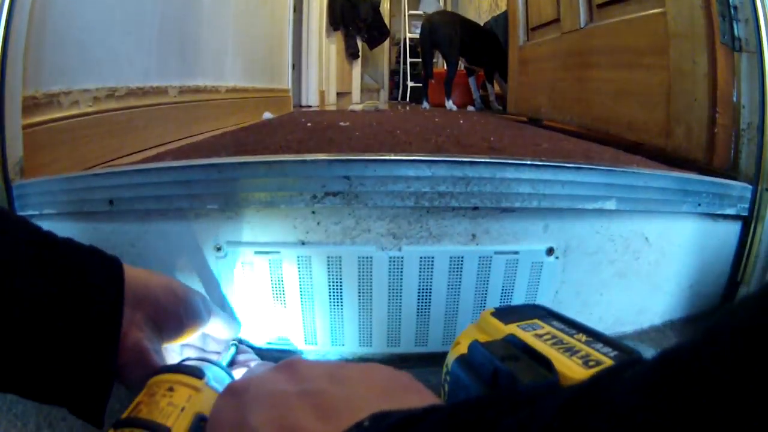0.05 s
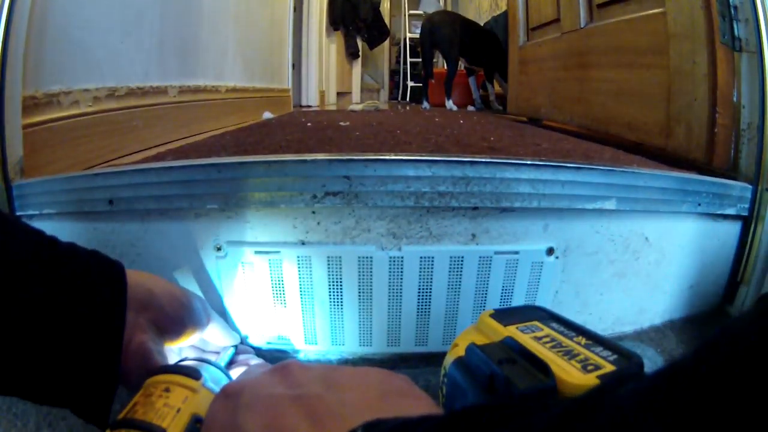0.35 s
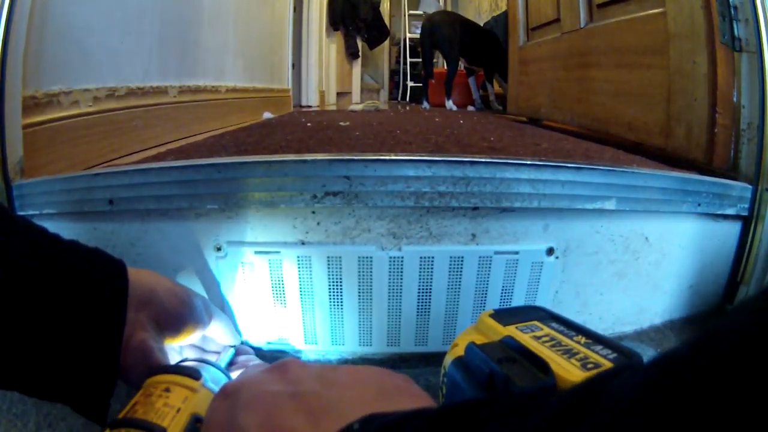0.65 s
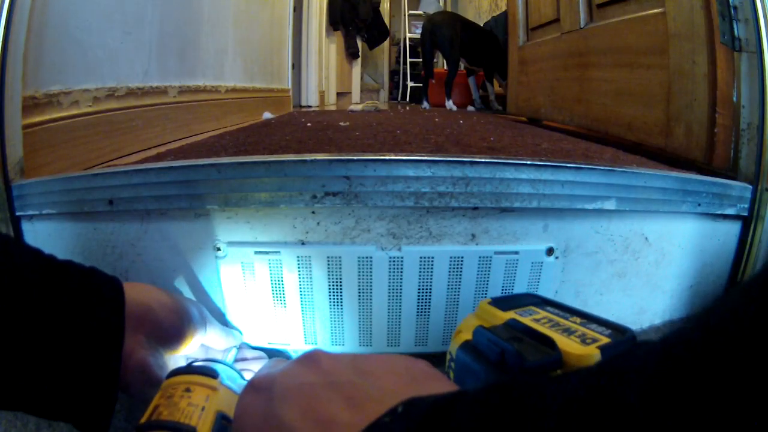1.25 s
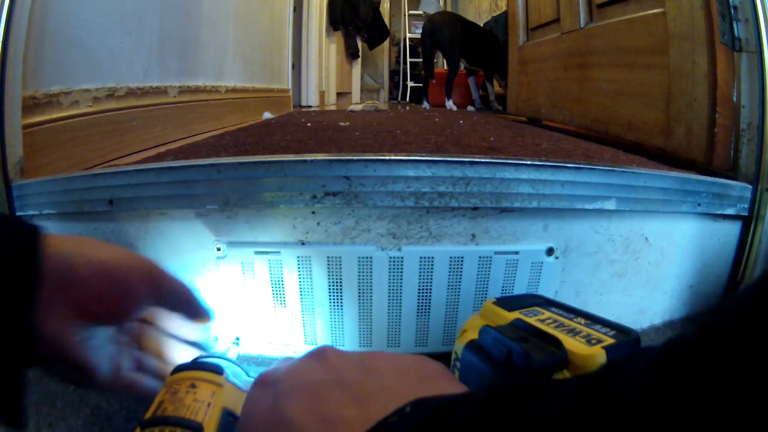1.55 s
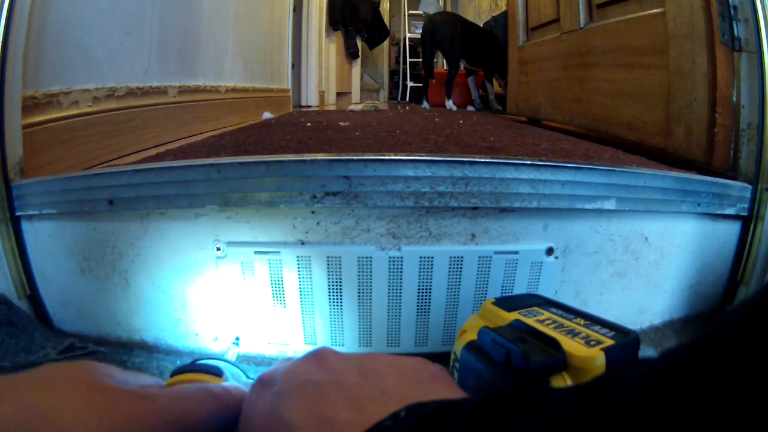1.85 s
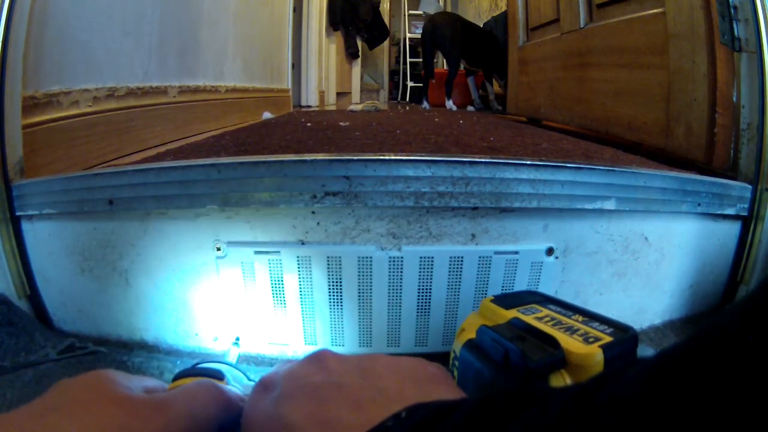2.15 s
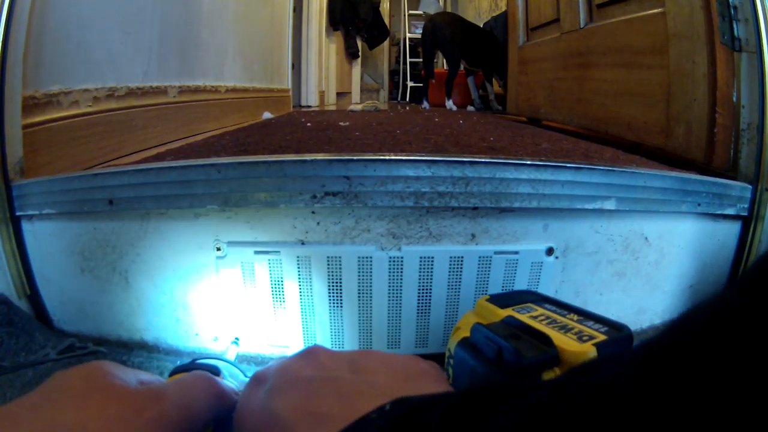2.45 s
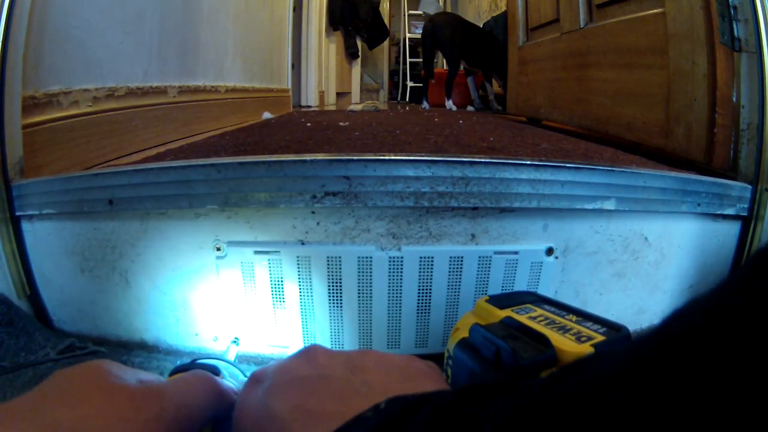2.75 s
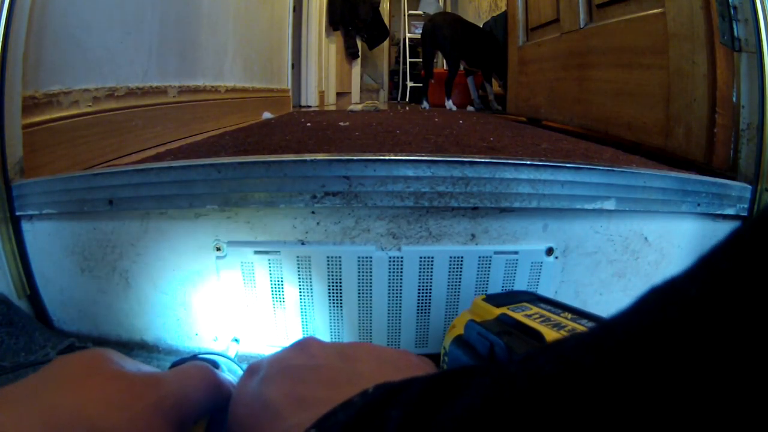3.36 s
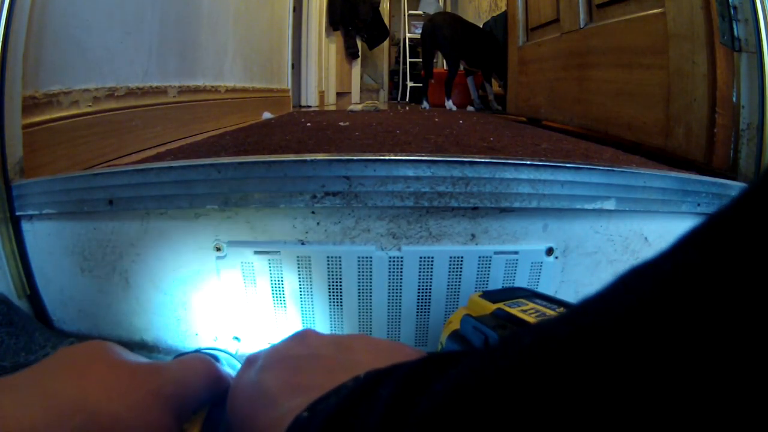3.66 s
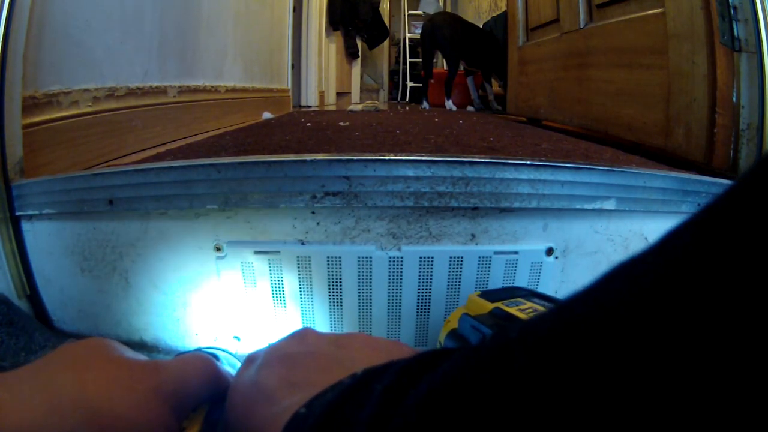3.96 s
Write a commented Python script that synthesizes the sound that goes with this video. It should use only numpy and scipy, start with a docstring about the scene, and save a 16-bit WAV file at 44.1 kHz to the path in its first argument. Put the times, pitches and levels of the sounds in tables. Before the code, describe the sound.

A cordless drill whirs in short bursts, driving a screw after light handling clicks.

```python
"""A cordless drill driver turns a screw in short trigger pulls, near the microphone in a small hallway.
First the tool is set in place with light clicks and rubs. Each pull starts with the whine of the
speed controller; then motor and gears spin up, rattle and run down. Step and floor, a hand's width
away, throw the sound straight back, and the hallway rings briefly over quiet room air."""
import sys
import numpy as np
from scipy import signal
from scipy.fft import rfft, irfft
from scipy.io import wavfile
from scipy.ndimage import uniform_filter1d

SR = 44100
rng = np.random.default_rng(int(sys.argv[2]) if len(sys.argv) > 2 else 0)


def persist_wave(psi):
    """Save psi, clipped to +-1, as 16-bit WAV."""
    counts = np.round(np.clip(psi, -1, 1) * 32767).astype(np.int16)
    wavfile.write(sys.argv[1], SR, np.atleast_2d(counts).T)


N = 176400
TIME = np.arange(N) / SR


def motor():
    """Gear tones, tooth impacts and grinding follow the shaft and sound through the housing."""
    # colour of the housing, and of the vents that let the gear tones out (frequency [Hz], level [dB])
    shell = [(35, -48), (60, -16.5), (209, -14), (835, -7.5), (1360, -4), (2110, -0.5), (2910, 1),
             (3840, -11), (4510, -15), (6380, -14), (7000, -20), (8200, -26), (10000, -38.5), (15000, -49)]
    vents = [(700, -13.5), (2100, 1.5), (3700, -5), (4700, -15), (6400, -5), (9000, -24.5)]
    teeth_per_turn, whir_full_hz = 6, 200
    speed, level, turns = shaft()
    running = level > level.max() / 20
    effort = level / level.max()
    whir = gear_tones(speed, effort, turns)
    teeth = np.diff(np.floor(turns * teeth_per_turn), prepend=0)
    teeth *= amp(4.5 * np.clip(rng.standard_normal(N), -2, 2))  # each tooth hits with its own force
    grind = rng.standard_normal(N) * (1 + .42 * np.cos(2 * np.pi * turns))
    whir_gain = amp(-1) * np.clip(speed / whir_full_hz, 0, 1) ** 2 * np.sqrt(effort)
    gears = whir_gain * housing(nearby(whir), vents, running)
    gears += amp(-8.5) * housing(teeth, shell, running)
    gears += amp(-5) * housing(grind, shell, running)
    low = panel(level, turns, running)
    flutter = amp(drift(hz=70))
    return level * flutter * gears + low


def shaft():
    """The shaft spins up and runs down with a slight wobble: gives speed [Hz], gain and turns made."""
    # one list for each run of the motor (time [s], shaft speed [Hz], level [dB])
    runs = [
        [(2.055, 14.7, -59.5), (2.12, 77, -39), (2.18, 108, -38), (2.25, 65, -44.5), (2.32, 57, -47),
         (2.365, 136, -33.5), (2.42, 158.6, -33.5), (2.49, 107, -32), (2.55, 85.4, -37.5), (2.6, 54, -43.5),
         (2.655, 117, -37), (2.71, 60.4, -43), (2.735, 17.5, -50)],
        [(3.034, 30.13, -50.5), (3.05, 140.2, -37), (3.08, 235.9, -32), (3.115, 308.6, -28.5),
         (3.145, 246.8, -28), (3.175, 165.8, -37), (3.205, 35.07, -53)],
        [(3.287, 21.85, -58), (3.322, 133.3, -36), (3.355, 213.1, -34.5), (3.385, 239.3, -27),
         (3.42, 196.8, -31), (3.46, 45.22, -51)],
        [(3.54, 30.06, -50.5), (3.573, 160.3, -27.5), (3.598, 221.8, -27), (3.611, 250.2, -21.5),
         (3.636, 281.3, -26), (3.651, 258.4, -24.5), (3.681, 184, -23.5), (3.689, 149.7, -27),
         (3.725, 30.24, -45.5)],
        [(3.882, 23.03, -63), (3.92, 112.4, -36.5), (3.955, 204.7, -31), (3.977, 248.6, -25),
         (4.0, 260.9, -28.5)],
    ]
    speed, level = np.zeros(N), np.zeros(N)
    for run in runs:
        times, hz, db = np.transpose(run)
        on = (TIME >= times[0]) & (TIME <= times[-1])
        speed += on * np.interp(TIME, times, hz)
        level += on * amp(np.interp(TIME, times, db))
    speed, level = uniform_filter1d(speed, size=500), abs(uniform_filter1d(level, size=120))
    turns = np.cumsum(speed * (1 + .009 * drift(hz=110))) / SR
    return speed, level, turns


def gear_tones(speed, effort, turns):
    """Motor and gears sing at multiples of the shaft speed; one tone swells under hard braking."""
    # tones of motor and gears (multiple of the shaft speed, level [dB])
    orders = [(4, -4), (6, -32.5), (8, 2.5), (10, -7), (12, -4), (14, -4.5), (16, 1), (20, -8), (24, -1.5)]
    brake_order, full_brake_hz_per_s = 16, 2500
    whir = np.zeros(N)
    for order, db in orders:
        roughness = 1 + .55 * drift(hz=59)
        phase = rng.random() * (order != brake_order)  # the braking tone adds in phase
        whir += amp(db) * roughness * np.sin(2 * np.pi * (order * turns + phase))
    braking = np.clip(-np.gradient(speed) * SR / full_brake_hz_per_s, 0, 1) * effort ** 2
    return whir + 1.5 * braking * np.sin(2 * np.pi * brake_order * turns)


def housing(drive, spectrum, running):
    """The housing colours a vibration and rings with it; rms 1 while the motor runs."""
    # resonances that flare as tones sweep through them (frequency [Hz], width [Hz], gain)
    modes = [(1986, 54, 0.31), (2860, 190, 0.54), (6390, 40, 0.39)]
    body = colour(drive, spectrum)
    body += sum(gain * ring(body, hz, width) for hz, width, gain in modes)
    return body / np.std(body[running])


def panel(level, turns, running):
    """The panel hums at its resonance, and the first multiples of the shaft speed growl through it."""
    # colour of the growl (frequency [Hz], level [dB])
    spectrum = [(90, -29), (170, -1), (330, -2.5), (560, -5.5), (1300, -13.5)]
    tones = sum((1 + .4 * drift(hz=70)) * np.sin(2 * np.pi * k * turns) for k in (1, 2, 4))
    growl = colour(tones, spectrum)
    hum = amp(-22.5) * level * resonance(hz=219, width_hz=20.5)
    return hum + amp(-33) * np.sqrt(level) * growl / np.std(growl[running])


def controller():
    """The switched current makes the windings sing while the trigger is part way in."""
    # whine at each trigger pull (start [s], length [s], level [dB])
    pulls = [(2.05, 0.15, -53.5), (2.317, 0.12, -50.5), (2.586, 0.11, -54.5), (3.03, 0.051, -47),
             (3.288, 0.14, -50.5), (3.537, 0.14, -48), (3.88, 0.064, -50)]
    switch_hz, rise_s, fall_s = 3912, .0064, .0021
    out = np.zeros(N)
    for start, length, db in pulls:
        t = np.arange(0, length, 1 / SR)
        phase = 2 * np.pi * switch_hz * t
        tone = np.sin(phase) + amp(-17.5) * np.sin(2 * phase)
        envelope = np.minimum(t / rise_s, 1) * np.minimum((length - t) / fall_s, 1)
        add(out, start, np.sqrt(2) * amp(db) * tone * envelope)
    return out


def knocks():
    """Each knock is a plastic clack and a slower, hollow thud of the panel; metal adds a bright tick."""
    # knocks of tool and bit (time [s], clack level [dB], thud level [dB], thud pitch [Hz])
    hits = [(0.669, -78, -53, 160), (0.806, -46, -41, 298), (0.851, -48, -44, 264),
            (1.271, -52.5, -40.5, 281), (1.31, -43.5, -42, 280), (1.551, -56.5, -46, 237),
            (1.615, -63, -49, 214), (1.848, -54.5, -51, 153), (1.862, -55.5, -47, 150),
            (2.055, -54, -61, 304), (2.119, -34.5, -64, 300), (2.364, -48, -49, 342),
            (2.662, -34, -64, 298), (2.986, -60.5, -69, 296.3), (3.296, -43.5, -69, 220.4),
            (3.545, -47, -46, 233), (3.742, -73, -40, 199.7), (3.894, -43.5, -43.5, 221)]
    # modes of the thud (multiple of its pitch, level [dB], t60 [s])
    thud_modes = [(0.999, 8, 0.034), (1.75, -2, 0.042)]
    # the bit strikes metal (time [s], level [dB])
    ticks = [(0.805, -47.5), (2.12, -50)]
    # colours of the clack and the tick (frequency [Hz], level [dB])
    plastic = [(300, -14), (1000, -8.5), (1700, 3), (2200, -1.5), (2950, -4.5), (3800, -25), (8000, -34),
               (12000, -64)]
    metal = [(2500, 10.5), (4500, 4), (8500, -1), (13000, -39)]
    crack_rise_s, thud_rise_s = .0006, .004
    out, t = np.zeros(N), np.arange(SR // 5) / SR

    def crack(db, spectrum, t60_s):
        """A short burst of coloured noise."""
        envelope = np.minimum(t / crack_rise_s, 1) * amp(db - 60 * t / t60_s)
        return 2 * colour(rng.standard_normal(len(t)) * envelope, spectrum)
    for start, clack_db, thud_db, hz in hits:
        thud = sum(amp(thud_db + db - 60 * t / t60) * np.sin(2 * np.pi * (k * hz * t + rng.random()))
                   for k, db, t60 in thud_modes)
        thud *= 1 - np.exp(-(t / thud_rise_s) ** 2)
        clack = crack(clack_db, plastic, t60_s=.024)
        loose_parts = crack(clack_db - 16, plastic, t60_s=.12)  # they rattle on after the clack
        add(out, start, clack + loose_parts + thud)
    for start, db in ticks:
        add(out, start, crack(db, metal, t60_s=.022))
    return out


def handling():
    """Hands, sleeves and tool rub and catch in small slips; each scrape sings at its own pitch."""
    # scrapes (middle [s], half length [s], level [dB], pitch [Hz])
    scrapes = [(0.107, 0.03, -61.5, 216.6), (0.148, 0.012, -63, 2087), (0.499, 0.01, -57.5, 1476),
               (0.546, 0.018, -64, 2770), (1.224, 0.021, -64.5, 780), (1.461, 0.015, -61.5, 792),
               (1.572, 0.033, -59, 330), (1.685, 0.012, -68.5, 1704), (1.87, 0.0097, -57, 2810),
               (1.975, 0.022, -61, 1610)]
    # colour of the friction (frequency [Hz], level [dB])
    spectrum = [(60, -5.5), (220, -5.5), (550, -9), (1600, -11.5), (2900, -15.5), (4300, -35.5),
                (12000, -50)]
    slips_per_s, scrape_q = 140, 4.5
    slips = (rng.random(N) < slips_per_s / SR) * rng.standard_normal(N)
    friction = rng.standard_normal(N) * amp(3 * np.clip(drift(hz=91), -2, 2))
    rub = nearby(unit(colour(friction + amp(-3.5) * unit(slips), spectrum)))
    out = np.zeros(N)
    for middle, half, db, hz in scrapes:
        swell = amp(db) * np.exp(-((TIME - middle) / half) ** 2 / 2)
        out += swell * (amp(-3) * rub + amp(-2) * resonance(hz, hz / scrape_q))
    return out


def nearby(x, t60_s=.03, share=.4):
    """Step and floor, a hand's width away, reflect at once, so gliding tones flare and drop out."""
    t = np.arange(0, t60_s, 1 / SR)
    taps = rng.standard_normal(len(t)) * amp(-60 * t / t60_s)
    reflected = signal.fftconvolve(x, taps / np.linalg.norm(taps))[:N]
    return np.sqrt(1 - share) * x + np.sqrt(share) * reflected


def hallway(x):
    """Dense reflections reach the microphone after 4 ms, each band dying at its own speed."""
    # decay of the hallway (frequency [Hz], t60 [s])
    decay_times = [(150, 0.38), (600, 0.25), (2800, 0.3), (5000, 0.4)]
    # strength of the reflections (frequency [Hz], level [dB])
    send = [(150, -6), (1000, -6), (2800, -14.5), (4500, -24.5)]
    taps = rng.standard_normal(SR) * (np.arange(SR) > SR // 250)
    hz, t, bands = signal.stft(taps, SR, nperseg=256)
    decay = amp(-60 * t / read(decay_times, hz)[:, None])
    decay *= amp(read(send, hz))[:, None] / np.sqrt(SR * np.mean(decay ** 2, axis=1, keepdims=True))
    response = signal.istft(bands * decay, SR, nperseg=256)[1]
    return signal.fftconvolve(x, response)[:N]


def background():
    """Quiet room air and a thin electronic tone."""
    # colour of the room air (frequency [Hz], level [dB])
    spectrum = [(15, -39.5), (25, -1), (271, -6.5), (879, -5), (1000, -9.5), (2500, -11), (4620, -21),
                (15000, -26)]
    tone_hz = 10530
    air = amp(-69) * unit(colour(rng.standard_normal(N), spectrum))
    return air + amp(-88) * np.sqrt(2) * np.sin(2 * np.pi * tone_hz * TIME)


def amp(db):
    """Decibels to gain."""
    return 10 ** (np.asarray(db) / 20)


def unit(x):
    """Scales to rms 1."""
    return x / np.sqrt(np.mean(x ** 2) + 1e-20)


def read(points, hz):
    """Reads a table on a log-frequency axis."""
    f, value = np.transpose(points)
    return np.interp(np.log(hz + 1), np.log(f + 1), value)


def add(mix, start_s, sound):
    """Mixes a sound in at the given time."""
    part = mix[max(round(start_s * SR), 0):][:len(sound)]
    part += sound[:len(part)]


def colour(x, points, size=4096):
    """Causal filter with the given spectrum; white noise keeps its level."""
    log_gain = np.log(amp(read(points, abs(np.fft.fftfreq(size, 1 / SR)))))
    taps = np.fft.ifft(np.exp(np.conj(signal.hilbert(log_gain)))).real[:size // 2]
    return signal.fftconvolve(x, taps / np.linalg.norm(taps))[:len(x)]


def drift(hz):
    """Slow random motion up to the given rate, rms 1."""
    rolloff = 1 + (np.fft.rfftfreq(N, 1 / SR) / hz) ** 4
    return unit(irfft(rfft(rng.standard_normal(N)) / rolloff, N))


def resonance(hz, width_hz):
    """Noise ringing in one narrow resonance."""
    phase = 2 * np.pi * hz * TIME
    return unit(drift(width_hz / 2) * np.cos(phase) + drift(width_hz / 2) * np.sin(phase))


def ring(x, hz, width_hz):
    """Passes a sound through one resonance of gain 1."""
    return signal.lfilter(*signal.iirpeak(hz, hz / width_hz, SR), x)


def scene():
    """Drill and hands close to one microphone, with the hallway behind them."""
    near = motor() + knocks() + handling()
    whine = controller()
    return (near + whine + hallway(near + .13 * whine) + background())[None]


def record(dry):
    """The recorder's band limit, with a soft stop."""
    edge_hz, fade_s = 15050, .002
    fade = np.minimum((TIME[-1] - TIME) / fade_s, 1)
    return signal.sosfilt(signal.ellip(10, .1, 90, edge_hz, fs=SR, output="sos"), dry * fade)


dry = scene()
out = record(dry)
persist_wave(out)
```